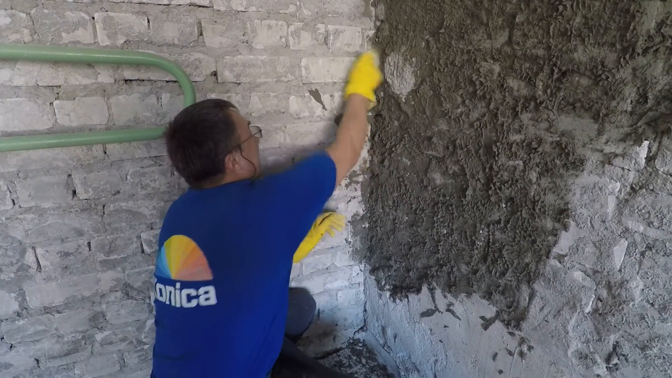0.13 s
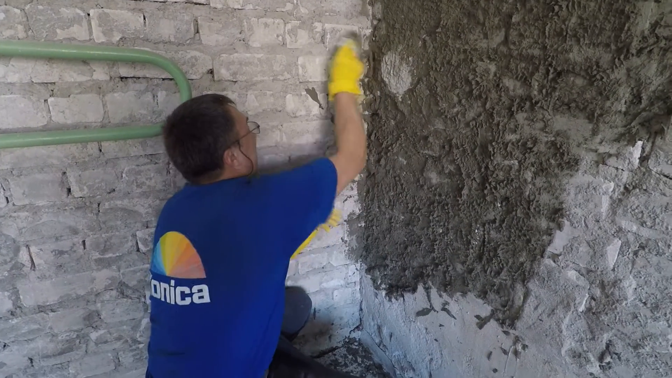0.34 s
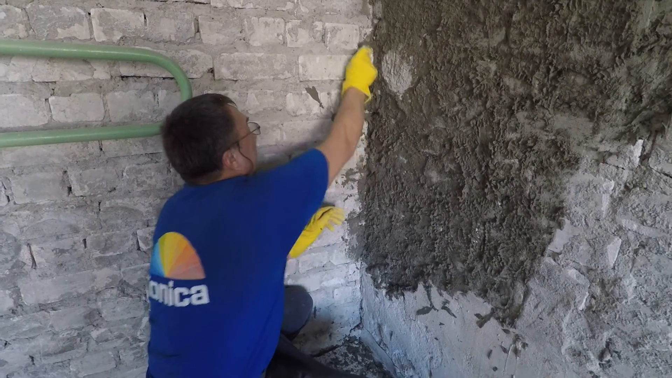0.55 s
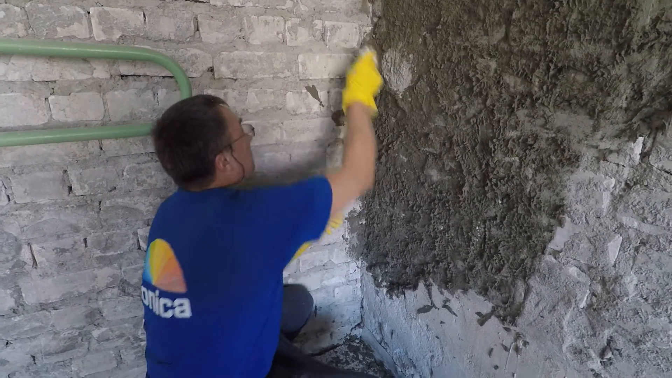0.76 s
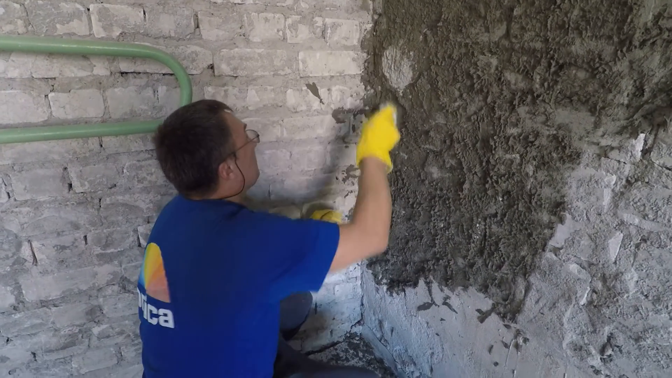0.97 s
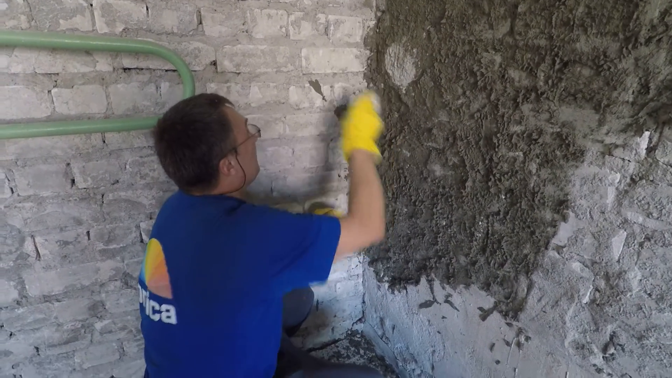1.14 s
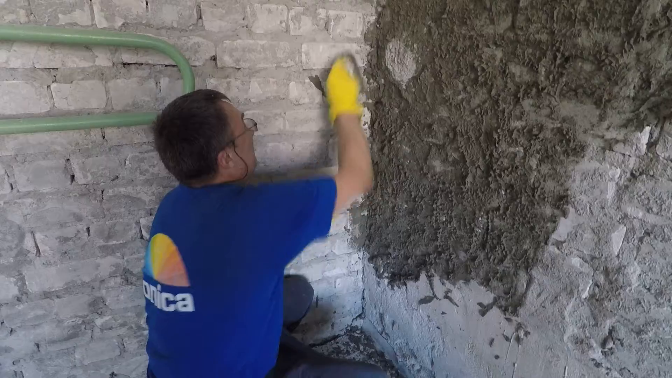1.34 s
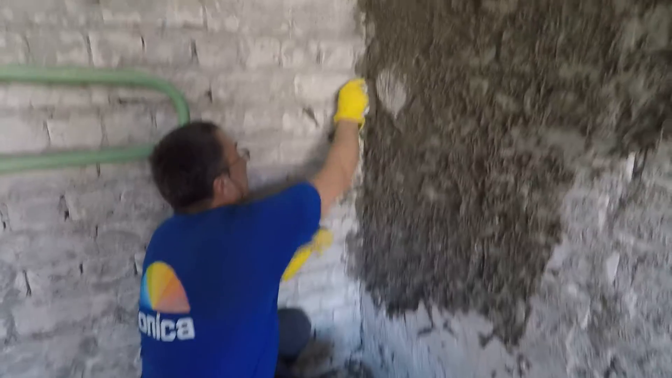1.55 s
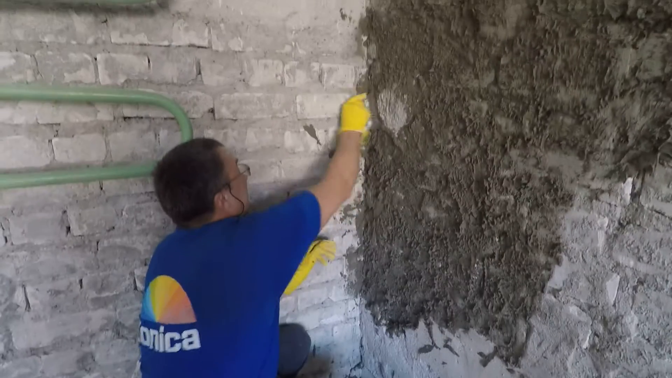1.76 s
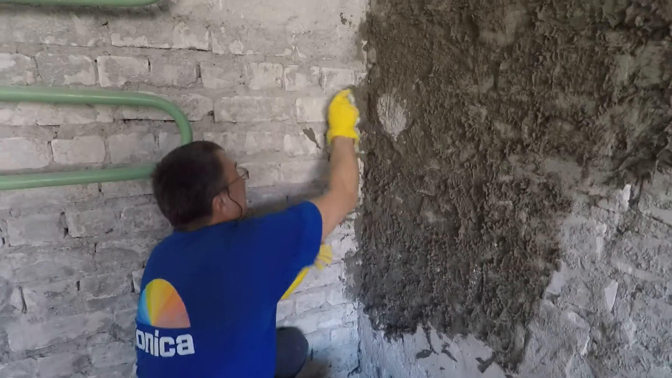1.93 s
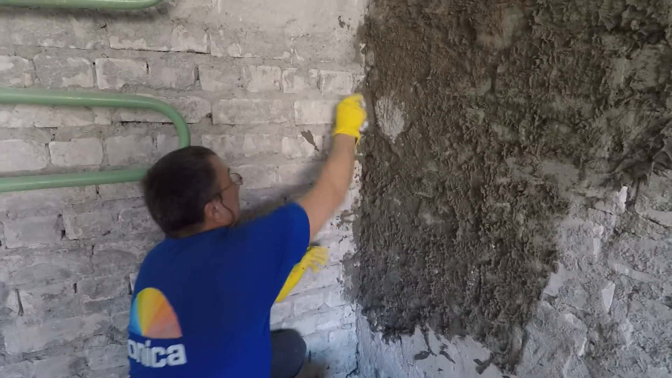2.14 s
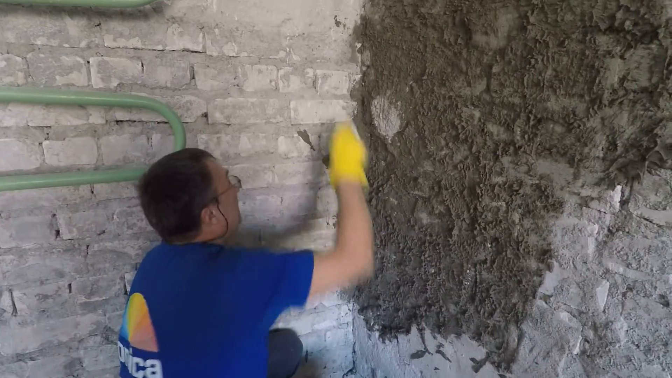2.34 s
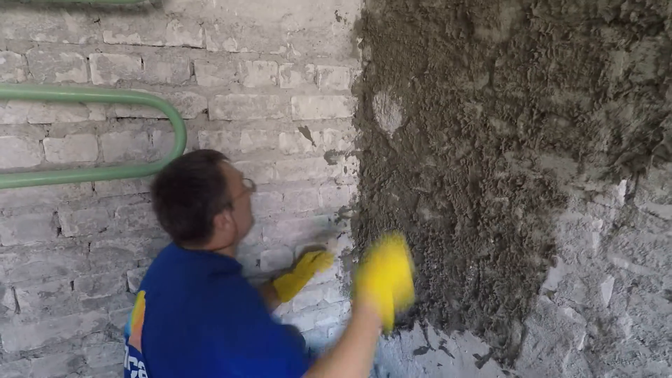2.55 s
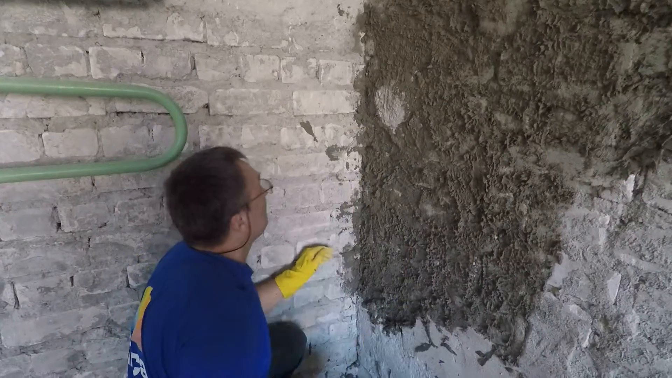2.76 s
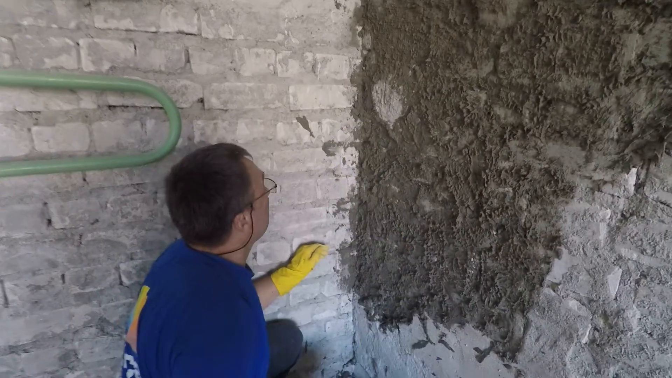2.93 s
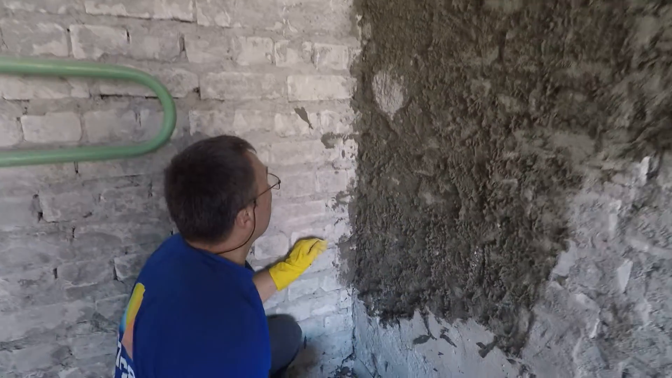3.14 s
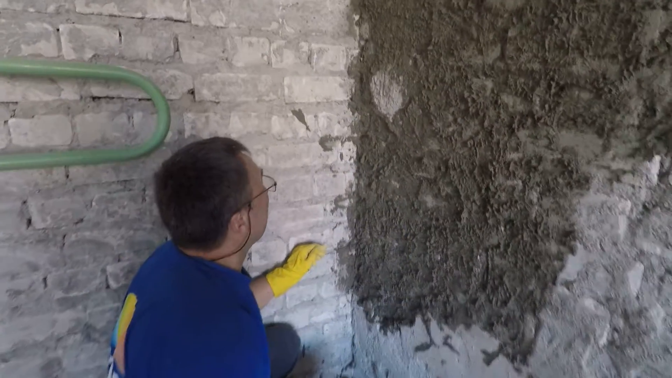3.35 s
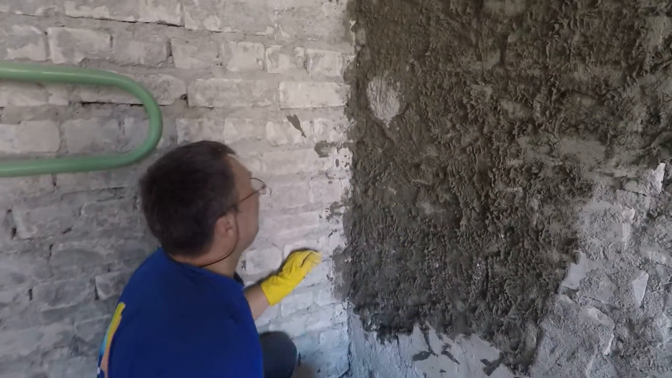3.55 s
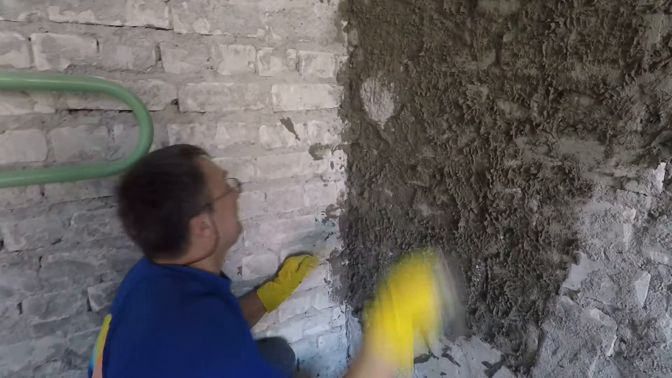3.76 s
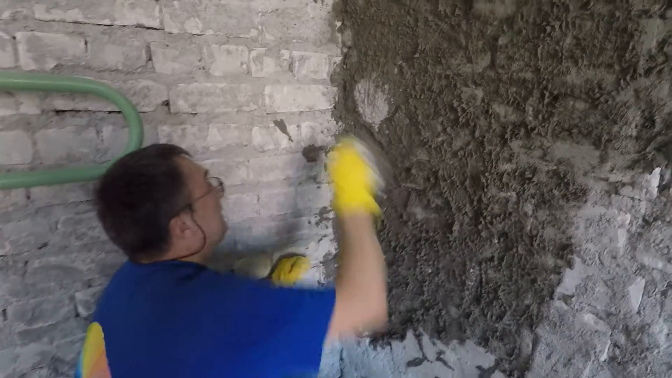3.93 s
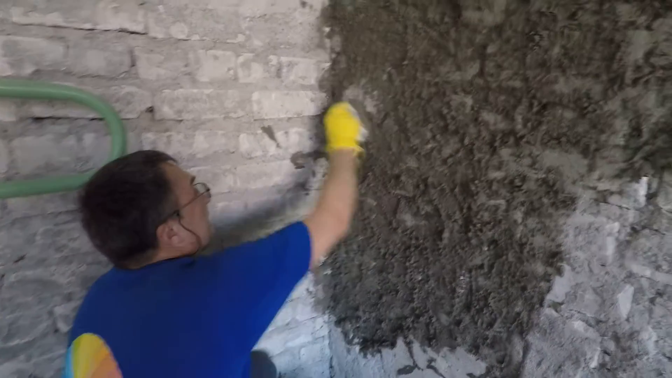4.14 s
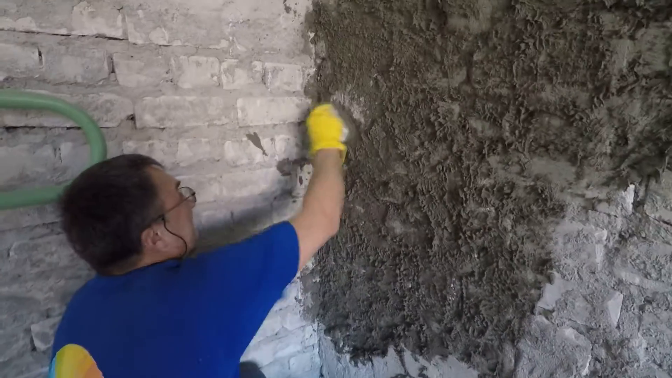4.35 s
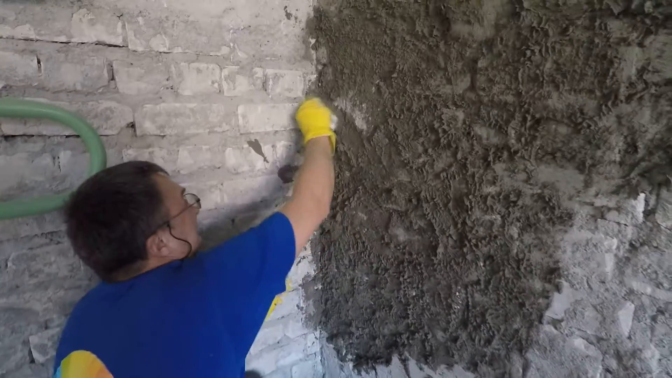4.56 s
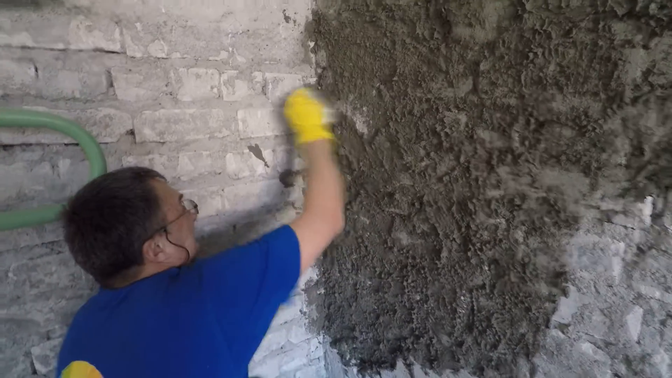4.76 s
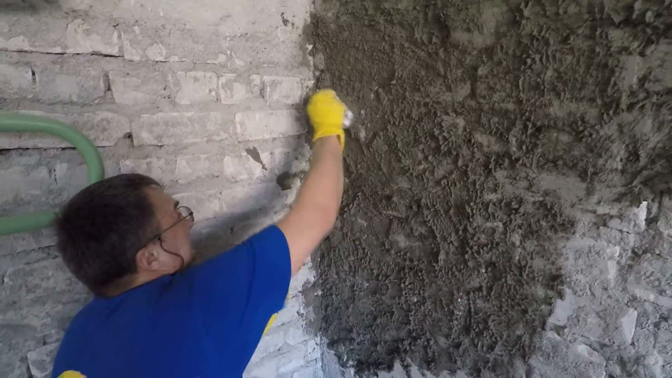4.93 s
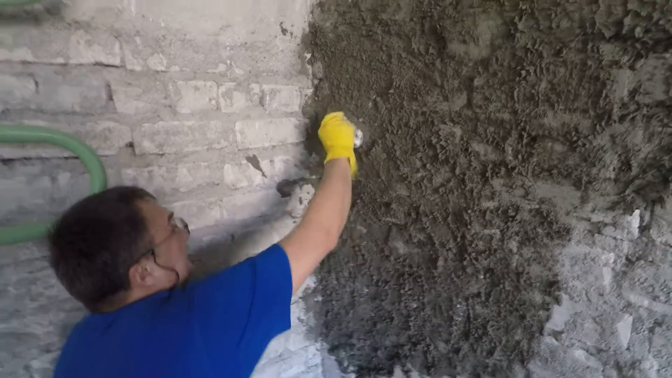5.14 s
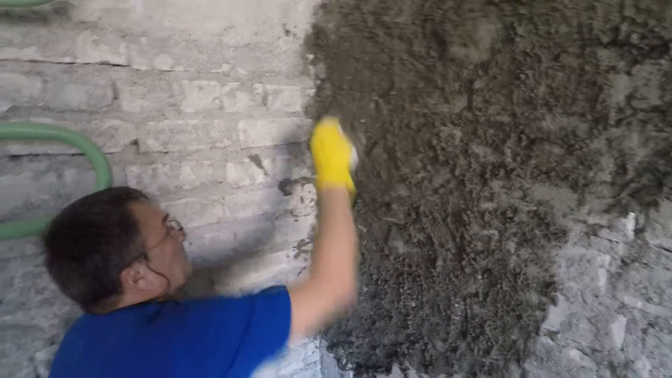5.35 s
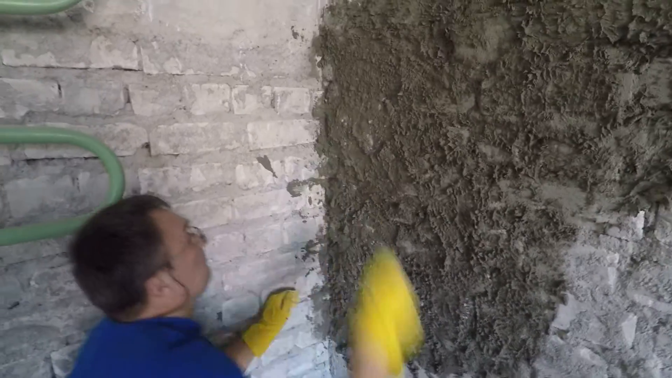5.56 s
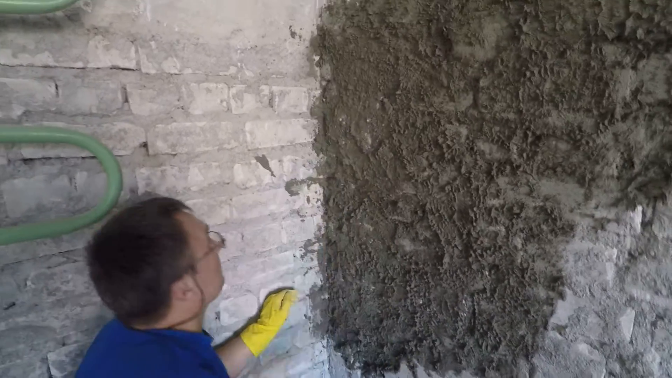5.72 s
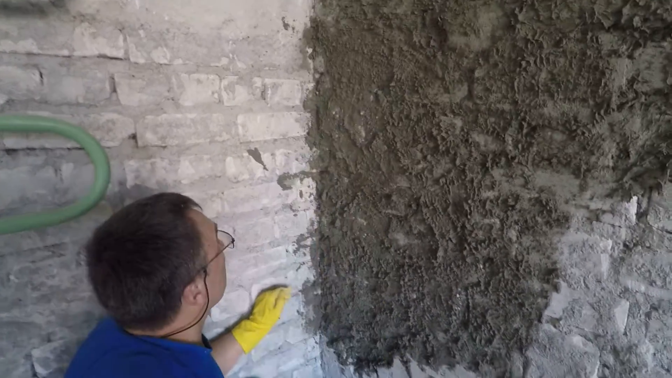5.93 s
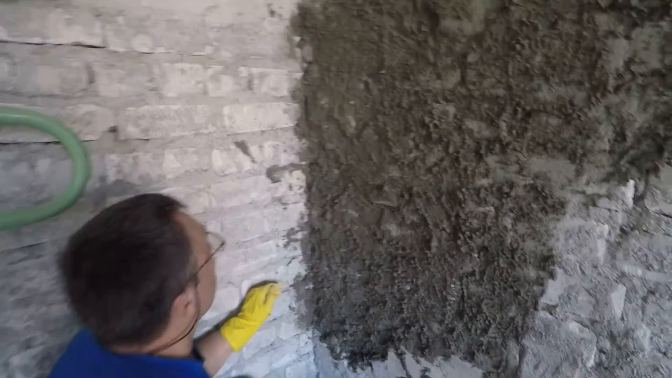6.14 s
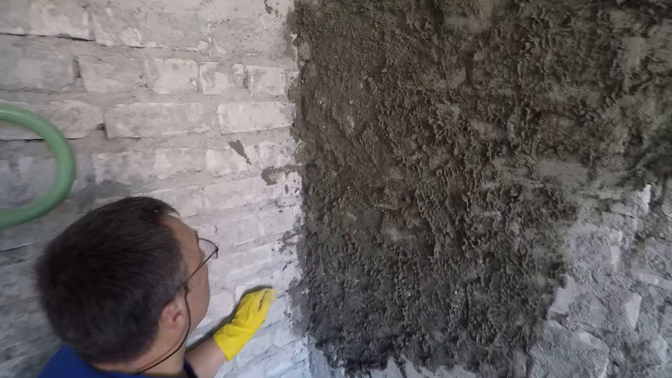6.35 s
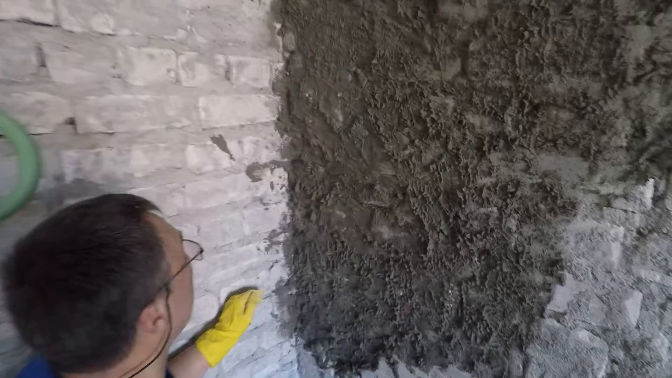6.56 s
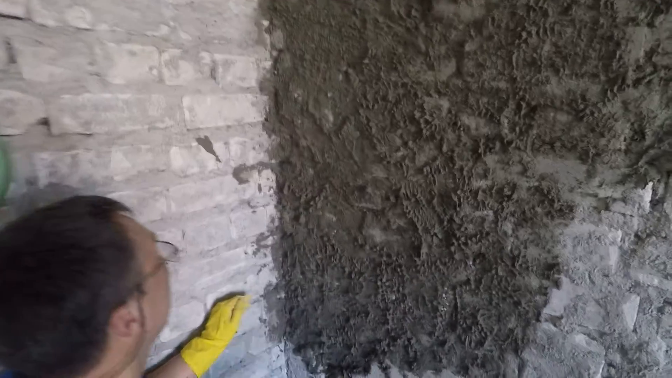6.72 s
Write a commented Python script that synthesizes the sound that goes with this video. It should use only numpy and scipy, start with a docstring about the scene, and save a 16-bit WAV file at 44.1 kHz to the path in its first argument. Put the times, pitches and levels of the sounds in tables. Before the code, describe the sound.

Gloved hand flings lumps of wet mortar at masonry, three bursts of sharp splats with short room echo, over lumpy low rumble and faint hiss.

```python
"""In a bare cellar room, a gloved hand flings wet plaster onto a brick wall near a small microphone.
Each lump lands as a rush of random clicks and one main blow, coloured by filters and drawn out by the room.
Between throws the glove scuffs (swelling noise) and crumbs drop (smaller, softer clusters of clicks).
A lumpy low rumble of narrow noise, which surges now and then, and a faint steady hiss lie under all."""
import sys
import numpy as np
from scipy import signal
from scipy.fft import rfft, irfft
from scipy.io import wavfile
from scipy.ndimage import uniform_filter1d

SR = 44100
rng = np.random.default_rng(int(sys.argv[2]) if len(sys.argv) > 2 else 0)


def transcribe(u):
    """Save the signal u as a 16-bit wav file named by the first command-line argument.

    u: samples, shape (n,) or (channels, n), limited to [-1, 1]; the rate is SR.
    q: integer samples, one column per channel.
    """
    v = np.clip(np.atleast_2d(u).T, -1, 1)
    q = np.round(v * 32767).astype(np.int16)
    wavfile.write(sys.argv[1], SR, q)


N = 303849
LEAD = 22050  # samples computed ahead of the scene, so that earlier sounds can ring into it
TAIL_DB = 0.5  # energy of the room tail over the direct sound


def slap(row):
    """Inelastic impact: a thrown lump shares one rise with all others; the weaker its blow, the longer it spreads."""
    rise_ms, spread_ms, wider_ms_per_db = 0.8, 4.17, 0.22
    *colour, hold_ms, blow_db = row
    lump_spread_ms = spread_ms - wider_ms_per_db * blow_db
    return splat((*colour, rise_ms, hold_ms, lump_spread_ms, blow_db), TAIL_DB)


def crumb(s, level_db, body_db, cup_db, spray_db, contact_ms):
    """Contact time governs a small hit: its rise, hold, spread and blow all follow from it."""
    rise_ms, hold_ms, spread_ms = contact_ms * np.array([1, 0.9, 1])
    blow_at_zero_db, softer_db_per_ms = -8.5, 3.7  # longer contacts have a weaker main blow
    blow_db = blow_at_zero_db - softer_db_per_ms * contact_ms
    bands_db = (body_db, body_db, body_db, cup_db, spray_db)
    tail_db = -4.5  # crumbs fall nearer the microphone, so the room tail is weaker
    return splat((s, level_db, *bands_db, rise_ms, hold_ms, spread_ms, blow_db), tail_db)


def splat(row, tail_db, grit_db=3.2, clicks_per_s=9000, push_db=1.5, wall_hz=9000, ripple_db=1.36, near_db=4.0):
    """Superposed impulses: bits strike in a rush, the weight in one blow; walls answer duller, the room rings on."""
    # Each row: delay in ms, level in dB, of the echoes from the nearest walls and floor.
    echoes = [(6.8, -4.5), (11.5, -8), (19, -10), (27, -13.5), (34, -8.5)]
    # Centres in Hz of thud, boom, smack, cupped slap, crack and spray.
    bands_hz = (280, 480, 950, 1650, 3000, 8000)
    s, level_db, thud_db, boom_db, smack_db, cup_db, spray_db, rise_ms, hold_ms, spread_ms, blow_db = row
    before = 1000  # samples ahead of the impact
    ms = np.arange(-before, 4000) * 1000 / SR

    def burst(m):
        """Exponential envelope: rise up to time 0, hold, then decay."""
        rise = np.minimum(m / max(rise_ms, .2), 0)
        decay = np.maximum(m - hold_ms, 0) / max(spread_ms, .5)
        return np.exp(rise - decay)

    energy = np.linalg.norm(burst(ms))  # root of the summed squares

    # random clicks with random size, sign and moment
    chance = rng.random((len(ms), 3))
    sizes = gain_of(-grit_db * np.log(chance[:, 0] + 0.025)) * np.sign(chance[:, 1] - .5)
    clicks = sizes * (chance[:, 2] < clicks_per_s / SR) * burst(ms)
    clicks *= energy / np.linalg.norm(clicks)
    blows = energy * (np.arange(len(ms)) == np.searchsorted(ms, hold_ms))

    # grit and crack are bright; below them the whole lump pushes the wall
    low, high = (signal.butter(2, 650, kind, fs=SR) for kind in ("low", "high"))
    bright = signal.lfilter(*high, clicks + gain_of(blow_db) * blows)
    treble = signal.lfilter(*signal.butter(1, wall_hz, "high", fs=SR), bright)
    bright += (gain_of(near_db) - 1) * treble
    push = signal.lfilter(*low, gain_of(push_db) * blows)

    # echo energies add up, carried by noise
    echo_power = sum((gain_of(db) * burst(ms - lag)) ** 2 for lag, db in echoes)
    walls = np.sqrt(echo_power) * rng.standard_normal(len(ms))
    # the nearest wall also returns the blow itself
    first_lag, first_db = echoes[0]
    walls[np.searchsorted(ms, hold_ms + first_lag)] += energy * gain_of(blow_db + first_db)
    walls = signal.lfilter(*signal.butter(1, wall_hz, fs=SR), walls)

    sound = np.zeros(SR + before)
    sound[:len(ms)] = bright + push + walls
    sound[before:] += gain_of(tail_db) * energy * tail(SR)

    # the crack is the 0 dB reference of the colour
    bands_db = (thud_db, boom_db, smack_db, cup_db, 0, spray_db)
    colour = [(90, thud_db - 12.0), (170, thud_db - 5.0)] + list(zip(bands_hz, bands_db))
    # the wall answers weakly just above the boom; every lump's uneven shape ripples its spectrum
    hz = np.geomspace(90, 16000, 70)
    wall_db = spectrum_at([(520, -0.69), (680, -1.5), (900, -0.093)], hz)
    ripple = ripple_db * rng.standard_normal(len(hz))
    rippled = np.transpose([hz, spectrum_at(colour, hz) + wall_db + ripple])
    coloured_sound = signal.fftconvolve(sound, minimum_phase(rippled))
    return LEAD + round(s * SR) - before, gain_of(level_db) * coloured_sound


def scuffing(patchy_db=4.0, drop_db=11.5):
    """Friction noise: fine grainy rubbing of glove and cloth swells and fades with each stroke."""
    # Each row: time of the peak in seconds, level in dB, then swell and fade, each the seconds per drop_db.
    strokes = [(1.06, -60, 0.18, 0.079), (3.12, -59, .06, .12), (3.58, -57.5, 0.18, .15),
               (5.56, -58.5, 0.095, 0.38), (5.868, -65, 0.017, .05), (5.994, -54, 0.036, 0.044),
               (6.184, -53, 0.093, 0.15), (6.82, -50, 0.21, 0.16)]
    t = (np.arange(N + LEAD) - LEAD) / SR
    level = 0
    for s, db, swell, fade in strokes:
        distance = np.maximum((s - t) / swell, (t - s) / fade)
        level = level + gain_of(db - drop_db * distance)
    patches = evened(uniform_filter1d(rng.standard_normal(len(t)), size=300))
    rubbing = coloured([(600, -33), (1400, -5), (4000, -10), (12000, 0)], len(t))
    return level * gain_of(patchy_db * patches) * rubbing


def room(x):
    """Convolution with an impulse response: rubbing is heard directly and through the room."""
    return x + gain_of(TAIL_DB) * signal.fftconvolve(x, tail(SR))[:len(x)]


def tail(size, onset_ms=12, patchy_db=1.5, modes_db=-17):
    """Reverberation: dense reflections build up, then die at each band's own speed, over low standing waves."""
    # Each row: frequency in Hz, reverberation time t60 in seconds.
    decay_times = [(150, 1), (400, 1), (1000, 0.91), (1700, 0.86), (2800, 0.69), (5000, .5), (8000, 0.5),
                   (14000, 0.7)]
    # Low standing waves of the cellar. Each row: frequency in Hz, relative level in dB, t60 in seconds.
    modes = [(268, -10, 2.9), (313.4, -2.5, 0.68), (322, -1, 0.74), (379, -1, 0.5), (443, 6.5, 0.46),
             (524, 17.5, 0.13)]
    t_s = np.arange(size) / SR
    build = 1 - np.exp(-(t_s * 1000 / onset_ms) ** 2)
    hz, t, z = signal.stft(build * rng.standard_normal(size), SR, nperseg=512)
    patches = uniform_filter1d(rng.standard_normal(z.shape), size=6, axis=0)
    patches = evened(uniform_filter1d(patches, size=4, axis=1))
    decay_db = 60 * t / spectrum_at(decay_times, hz)[:, None]
    dense = signal.istft(z * gain_of(patchy_db * patches - decay_db), SR, nperseg=512)[1][:size]

    phases = 2 * np.pi * rng.random(len(modes))
    waves = np.zeros(size)
    for (f, db, t60), phase in zip(modes, phases):
        waves += gain_of(db - 60 * t_s / t60) * np.sin(2 * np.pi * f * t_s + phase)
    waves *= 1 - np.exp(-t_s * 1000 / onset_ms)
    return dense / np.linalg.norm(dense) + gain_of(modes_db) * waves / np.linalg.norm(waves)


def rumble():
    """Low-frequency pressure noise: deep and lumpy parts surge now and then; independent powers add."""
    # Slow level before the surges. Each row: time in seconds, level in dB.
    slow_level = [(0.0, -52), (0.4, -48), (0.6, -52.5), (1.3, -53.5), (1.6, -45.5), (2.2, -51.5),
                  (2.7, -48), (2.85, -55), (3.1, -48), (3.7, -48.5), (4.1, -53.5), (4.5, -48.5), (5.3, -50),
                  (6.0, -50), (6.5, -47), (6.89, -47)]
    # Spectra of the deep part and of the lumps above it. Each row: frequency in Hz, relative level in dB.
    deep_shape = [(12, -8), (26, -6.5), (45, -6), (70, -24), (110, -51), (200, -78)]
    lump_shape = [(40, -10), (65, 6), (100, -3.5), (160, -13.5), (300, -23), (500, -59)]
    # Each row: centre in seconds, length in seconds, deep level in dB, level of the upper lumps in dB.
    surges = [(1.49, 0.065, -36, -42.5), (1.82, 0.028, -40.5, -55), (1.94, .1, -46, -58),
              (2.203, 0.14, -44.5, -52), (2.984, 0.053, -41.5, -52), (3.342, 0.098, -39.5, -57),
              (4.252, 0.11, -40, -56.5), (4.84, 0.044, -42, -57), (5.143, 0.085, -43, -60),
              (5.419, 0.065, -45.5, -50.5), (6.199, 0.071, -49, -49), (6.552, 0.037, -45.5, -51),
              (6.714, 0.056, -43, -48.5)]
    lumps_db = -12  # upper lumps under the deep rumble, outside the surges
    t = np.arange(N) / SR
    slow = gain_of(np.interp(t, *np.transpose(slow_level)))
    deep_power = slow ** 2
    lump_power = (gain_of(lumps_db) * slow) ** 2
    for s, length, deep_db, lump_db in surges:
        bell = np.exp(-(2 * (t - s) / length) ** 2)
        deep_power += bell * gain_of(2 * deep_db)
        lump_power += bell * gain_of(2 * lump_db)
    deep = np.sqrt(deep_power) * steadied(coloured(deep_shape, N))
    lumps = np.sqrt(lump_power) * steadied(coloured(lump_shape, N))
    return deep + lumps


def hiss():
    """Stationary random noise: a faint hiss of fixed spectrum and level."""
    # Each row: frequency in Hz, relative level in dB per Hz.
    hiss_shape = [(88, -23), (150, -0.5), (189, -6), (559, -9), (1340, -12.5), (1620, -14.5), (1750, -11.5),
                  (3870, -12), (8240, -20.5), (14400, -23.5), (15300, -25)]
    return gain_of(-64.5) * coloured(hiss_shape, N)


def steadied(x, share=0.58):
    """Envelope compression: evens out part of the chance swells of narrow noise."""
    envelope = uniform_filter1d(abs(signal.hilbert(x)), size=1500)
    return evened(x / (envelope + 0.11) ** share)


def coloured(points, size):
    """Spectral shaping: filters white noise to a given spectrum, at rms 1."""
    white = rfft(rng.standard_normal(size))
    gain = gain_of(spectrum_at(points, np.fft.rfftfreq(size, 1 / SR)))
    return evened(irfft(white * gain, size))


def minimum_phase(points, size=4096):
    """Minimum phase: the Hilbert transform of the log gain gives the causal impulse response of a spectrum."""
    level_db = np.maximum(spectrum_at(points, abs(np.fft.fftfreq(size, 1 / SR))), -100)
    log_gain = np.log(gain_of(level_db))
    return np.fft.ifft(np.exp(np.conj(signal.hilbert(log_gain)))).real[:size // 2]


def spectrum_at(points, hz):
    """Logarithmic pitch axis: interpolates the values of a spectrum over log frequency."""
    f, value = np.transpose(points)
    return np.interp(np.log(hz + 1), np.log(f + 1), value)


def gain_of(db):
    """Decibel law: converts a level to an amplitude gain."""
    return 10 ** (np.asarray(db) / 20)


def evened(x):
    """Mean power: scales a signal to rms 1."""
    return x / np.sqrt(np.mean(x ** 2) + 1e-20)


def add(mix, at, sound):
    """Superposition: adds a sound to the mix from sample at."""
    part = mix[at:at + len(sound)]
    part += sound[:len(part)]


def scene():
    """Linear superposition: lumps, crumbs and scuffs sum in the air and reach the housed microphone."""
    # Lumps landing, the first just before the scene opens. Each row: time in seconds, gain in dB, thud,
    # boom, smack, cupped slap and spray in dB, time to the main blow in ms, main blow in dB.
    slaps = [(-.17, -30, -11, 2, 4, 4, 0, 3, -8), (.186, -27.5, 2.5, -10.5, -5, -5, 3, 2.5, -44),
             (.487, -25.5, -4, -10.5, -5.5, -11, -2, 7.9, -7),
             (0.4995, -29.5, 8, -20, 7.5, 8.5, -20, 0.75, -1),
             (1.4716, -27, -12, -0.5, -2, 1.5, 3.5, 2.6, -19), (1.7855, -28, -0.5, 2, 4, 1, 4.5, 1.75, -16),
             (2.043, -22.5, 7.5, -5, -4, -2, -0.5, 1.37, -1.5),
             (4.148, -23.5, 7, -4, -11, -4, 2.5, 5.3, -9), (4.3958, -23.5, 8, -3, -9.5, -2.5, 0, 2, -0.5),
             (4.606, -27, 16, 8.5, -7.5, -2, 3, 3.6, -4), (4.873, -23, 1.5, -1, -6.5, -3.2, -2.5, 3.3, -2),
             (5.1462, -23, 2, -9.5, -7, -7, 0, 1.43, -2.5)]
    # Crumbs dropping and small taps of the glove. Each row: time in seconds, gain in dB, body,
    # cupped slap and spray in dB, contact time in ms.
    crumbs = [(1.055, -51, 2, -16, 3, 3.8), (1.18, -53, -5, -13, 2, 3), (2.036, -47, -7, 0, 10, 5),
              (3.140, -51, -15, -8, 14, 1.1), (3.146, -43, 4, 5.5, 6.5, 2.7), (3.40, -62.5, -9, 9, -6, 8.3),
              (3.586, -48.5, -7, -3.5, 8.5, 11), (4.112, -60, -9, -6, 9, 1.5), (4.143, -48, -5, -4, -5, 3),
              (5.601, -59, 14, 11, 2, 1.4), (5.656, -51, -4, -10, -17, 4), (5.864, -52, 0, 2.5, -9, 7.2),
              (5.976, -52, -10, -5, -16, 13), (6.167, -55.5, 10, 9.5, 4, 4.5), (6.19, -51, 7, 2, 2, 1.5),
              (6.198, -45, 1.5, 2, 11, 3), (6.3, -59.5, 6, 2, -1, 12), (6.695, -65, 21, 18, -9, 2.6)]
    # Colour of the microphone in its housing. Each row: frequency in Hz, gain in dB.
    housing = [(100, -10.5), (1250, -5), (1680, 1.5), (2150, -3.5), (2700, 2.5), (3250, 2.5), (3900, -2),
               (4500, -10), (5600, -12.5), (7500, -19), (8700, -25), (15000, -39)]
    air = room(scuffing())
    for row in slaps:
        add(air, *slap(row))
    for row in crumbs:
        add(air, *crumb(*row))
    heard = signal.fftconvolve(air, minimum_phase(housing))[LEAD:LEAD + N]
    return (heard + rumble() + hiss())[None]


def record(dry):
    """Band limitation: a linear-phase low-pass marks the upper edge of the recorder."""
    edge_hz = 15330
    lowpass = signal.firwin(511, edge_hz, window=("kaiser", 9), fs=SR)
    return signal.oaconvolve(dry, lowpass[None], "same")


dry = scene()
out = record(dry)
transcribe(out)
```